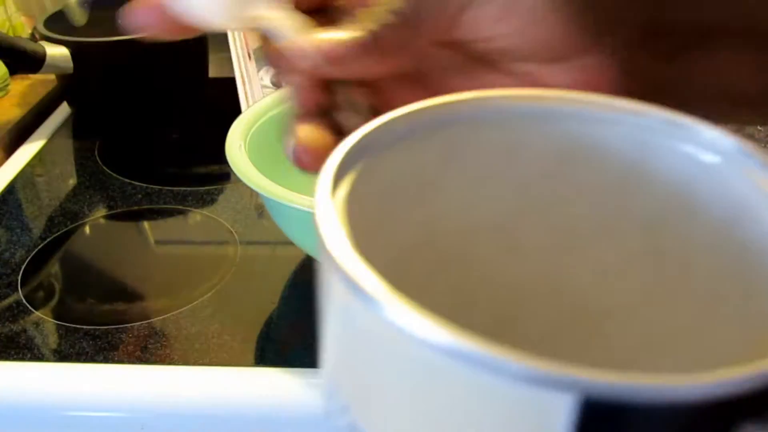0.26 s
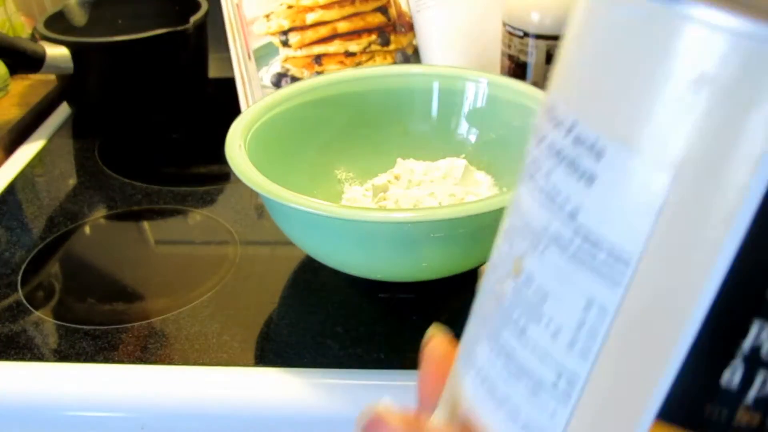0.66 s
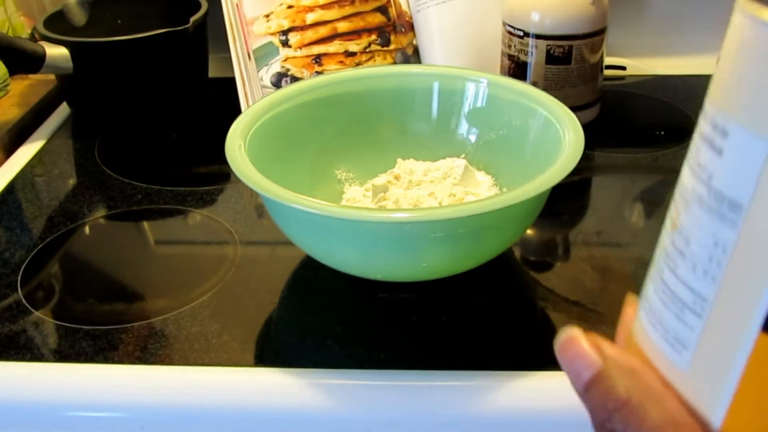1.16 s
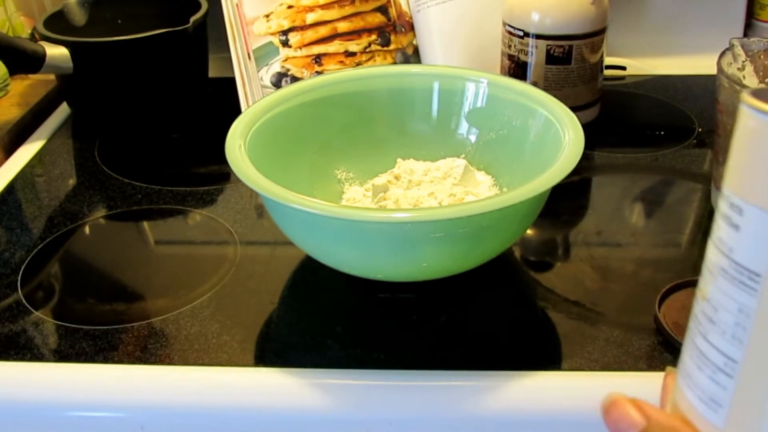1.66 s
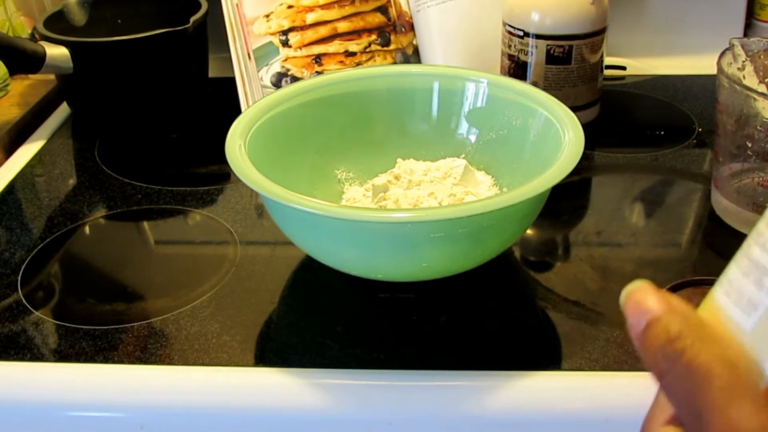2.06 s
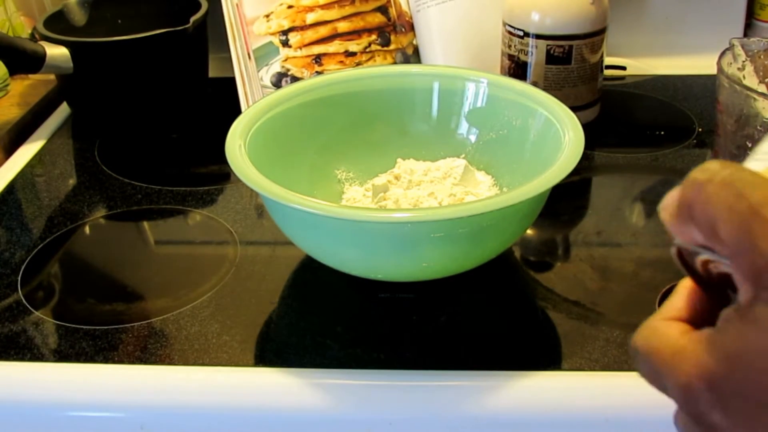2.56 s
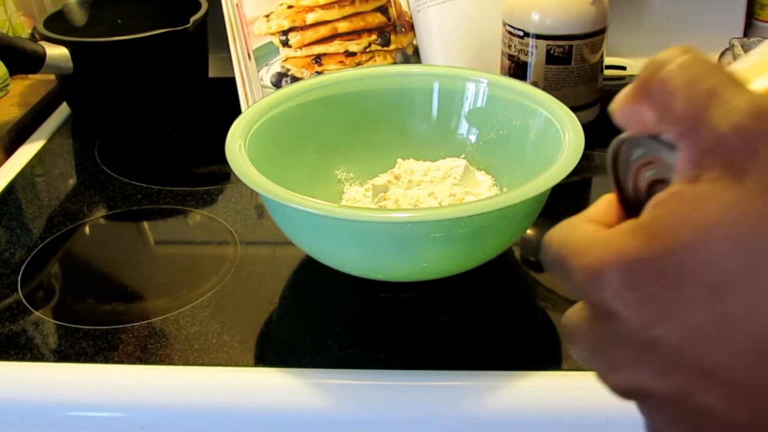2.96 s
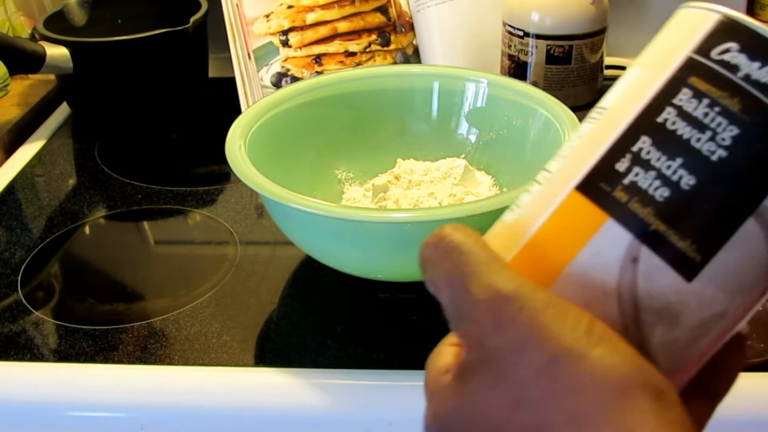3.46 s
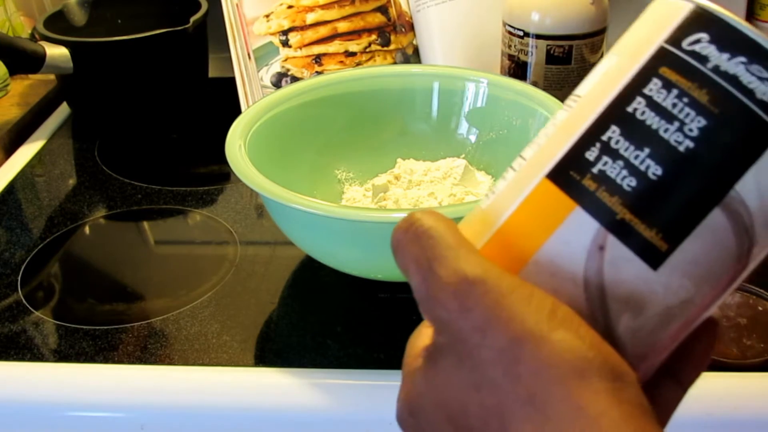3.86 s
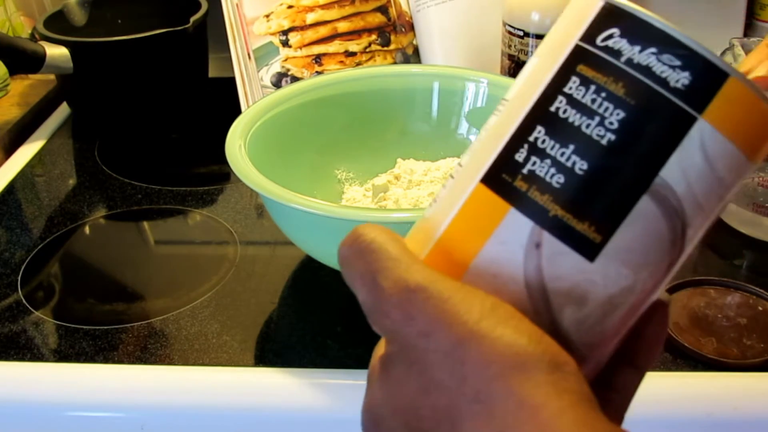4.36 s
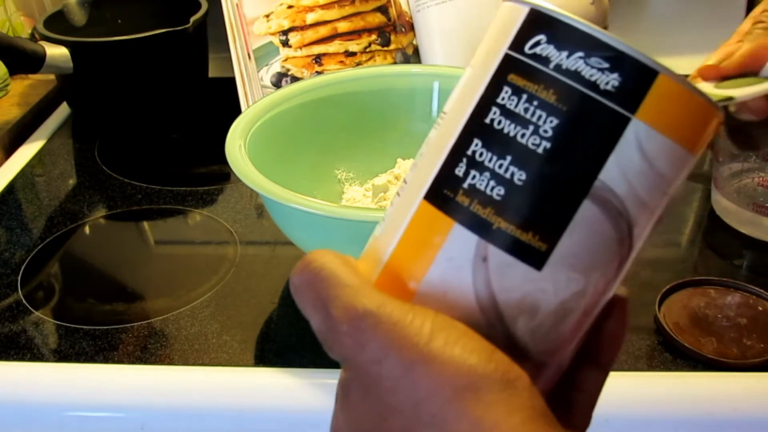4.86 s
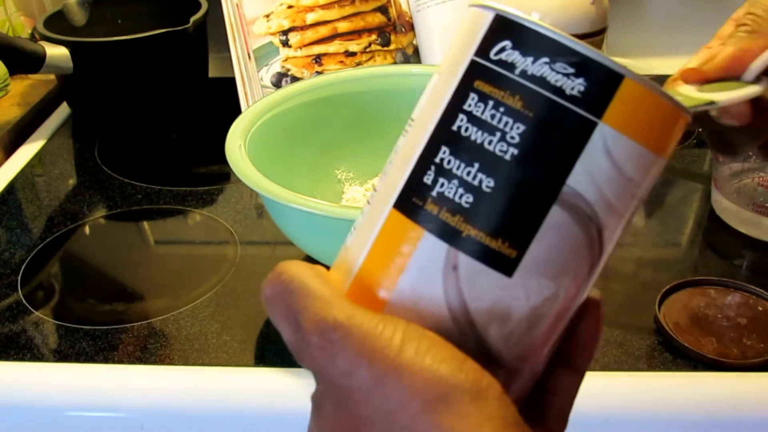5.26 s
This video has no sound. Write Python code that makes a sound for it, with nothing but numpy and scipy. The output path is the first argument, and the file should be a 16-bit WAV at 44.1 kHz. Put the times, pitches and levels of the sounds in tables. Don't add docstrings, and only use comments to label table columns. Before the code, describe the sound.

A small, reflective kitchen heard close in stereo, with low fridge hum, faint rumble and soft hiss. At 0.02-0.07 s a tight volley of very loud, bright plastic clacks bursts out as measuring spoons swing on their ring. Small ticks follow, a strong clack at 0.59, then a dense rattle with rough scraping from 0.65 to 0.83. From 1.25 to 2.15 the spoons are sorted toward the right: separate clicks, dry slides, sharp cracks near 1.4 and 1.89. At 2.33-2.5 a canister is jolted and rapped hollowly; crisp snaps come at 2.59 and 2.76 amid gritty rubbing. Short scrapes and rustling skin and powder fill 3.1-3.4. Blunt, hollow knocks with low thumps land at 3.6, 3.87 and 3.99, quieter ones around 4.4, with a firm rub at 4.8. A light tap at 5.1 leads to a hard knock and clack at 5.25, then near quiet.

```python
import sys
import numpy as np
from scipy import signal
from scipy.fft import rfft, irfft
from scipy.io import wavfile
from scipy.ndimage import uniform_filter1d

SR = 44100
rng = np.random.default_rng(int(sys.argv[2]) if len(sys.argv) > 2 else 0)


def rack_gain(trim_db):
    fader = np.asarray(trim_db, float)
    return 10 ** (fader / 20)


def transcribe(u):
    v = np.clip(np.atleast_2d(u).T, -1, 1)
    q = np.round(v * 32767).astype(np.int16)
    wavfile.write(sys.argv[1], SR, q)


N = 242550

# (frequency [Hz], level [dB], t60 [s])
CANISTER_MODES = [(297, -11.5, 0.093), (433, -4, 0.044), (480, -11, 0.14), (556.4, -8.5, 0.18),
                  (595.4, -9.5, 0.15), (657, 1, 0.039), (764, -10.5, 0.062), (1180, -12, 0.053),
                  (2200, -13, .05), (3950, -19, .06)]
# (time [s], level [dB])
BUSYNESS = [(0.0, -44), (0.26, -58), (0.4, -51.5), (0.52, -49), (0.63, -44), (0.8, -41), (1.06, -55),
            (1.24, -52), (1.6, -58), (1.9, -53), (2.2, -53.5), (2.5, -50.5), (2.86, -57.5), (3.1, -51.5),
            (3.27, -53), (3.45, -56.5), (3.89, -55), (4.5, -66)]
SIDE_SCATTER_DB = 1.9


def rms_one(x):
    return x / np.sqrt(np.mean(x ** 2) + 1e-20)


def in_time(rows):
    s, *columns = np.transpose(rows)
    return [np.interp(np.arange(N) / SR, s, c) for c in columns]


def at_hz(points, hz):
    table_hz, values = np.transpose(points)
    return np.interp(np.log(hz + 1), np.log(table_hz), values)


def coloured(x, spectrum):
    hz = np.fft.rfftfreq(x.shape[-1], 1 / SR)
    return rms_one(irfft(rfft(x) * rack_gain(at_hz(spectrum, hz)), x.shape[-1]))


def bandpass(low_hz, high_hz):
    return signal.butter(2, [low_hz, high_hz], "band", fs=SR, output="sos")


def diffuse(size):
    # (frequency [Hz], correlation [-1 to 1])
    likeness = [(60, -0.48), (180, -0.41), (550, -0.062), (1650, -0.13), (4970, 0.041), (15000, -0.4)]
    mid, side = rfft(rng.standard_normal((2, size)))
    alike = np.clip(at_hz(likeness, np.fft.rfftfreq(size, 1 / SR)), -.95, .95)
    pair = np.sqrt(1 + alike) * mid + np.sqrt(1 - alike) * side * [[1], [-1]]
    return irfft(pair, size) / np.sqrt(2)


def resonance(x, hz, width_hz):
    r, w = np.exp(-np.pi * width_hz / SR), 2 * np.pi * hz / SR
    return signal.lfilter([(1 - r * r) / 2, 0, (r * r - 1) / 2], [1, -2 * r * np.cos(w), r * r], x)


def stroke(start, peak, end, start_db=-16.5, end_db=-17):
    t = np.arange(N) / SR
    on = np.clip(np.minimum((t - start) / .004, (end - t) / .02), 0, 1)
    return on * rack_gain(np.interp(t, [start, peak, end], [start_db, 0, end_db]))


def add(out, sound, s, pan_db):
    lag_per_db = .16
    treble_side = .55
    treble = signal.lfilter(*signal.butter(2, 6000, "high", fs=SR), sound)
    for side, sign in zip(out, (-1, 1)):
        at = round(s * SR) + max(0, round(sign * pan_db * lag_per_db))
        heard = (sound - treble) * rack_gain(-sign * pan_db / 2)
        heard = heard + treble * rack_gain(-sign * pan_db * treble_side / 2)
        side[at:at + len(sound)] += heard[:N - at]


def room_tone():
    # (frequency [Hz], level [dB rms])
    hum_tones = [(120, -62.5)]
    # (frequency [Hz], density [dB per Hz])
    rumble_colour = [(12, -45), (20, -4.5), (71, -3), (120, 0.5), (251, -6.5), (489, -8.5), (536, -10.5),
                     (872, -14), (1500, -24), (1950, -26), (3300, -120)]
    # (frequency [Hz], density [dB per Hz])
    hiss_colour = [(710, -37), (1200, 1), (3480, 1), (11000, -7), (15300, -14.5), (16000, -23),
                   (16500, -50)]
    # (time [s], level [dB])
    gain = [(0.0, 7.5), (0.1, -11), (0.3, -8.5), (0.6, -0.8), (2.6, 0), (2.9, -2.5), (3.9, 0.5),
            (5.5, -1.5)]
    rumble_db, hiss_db = -52, -61.5
    (gain_db,), (busy_db,) = in_time(gain), in_time(BUSYNESS)
    t = np.arange(N) / SR
    wobble = 1 + 0.24 * rms_one(uniform_filter1d(rng.standard_normal((2, N)), size=3000))
    hum = sum(rack_gain(db + 2.5) * np.sin(2 * np.pi * hz * t) for hz, db in hum_tones) * wobble
    rumble = rack_gain(rumble_db + gain_db + 4.5) * coloured(diffuse(N), rumble_colour)
    hiss_level = np.hypot(rack_gain(busy_db), rack_gain(hiss_db + gain_db))
    return hum + rumble + hiss_level * coloured(diffuse(N), hiss_colour)


def kitchen(x, wet_db):
    # (frequency [Hz], t60 [s])
    decay = [(200, 0.29), (600, 0.35), (3500, 0.39), (8000, 0.26), (15000, 0.29)]
    places, stretch = 7, round(.21 * SR)
    t, out = np.arange(round(.45 * SR)) / SR, np.zeros((2, N))
    edges = 100 * 2 ** np.arange(0, 7.6, 1.0)
    noise, tails = np.array([diffuse(len(t)) for place in range(places)]), 0
    for low, high in zip(edges, np.append(edges[1:], 18000)):
        band = signal.sosfilt(bandpass(low, high), noise)
        tails = tails + band * rack_gain(-60 * t / at_hz(decay, np.sqrt(low * high)))
    tails = tails * (1 - np.exp(-t / 0.0016)) * (1 + 2.14 * rack_gain(-60 * t / 0.15))
    tails = tails / np.sqrt(np.mean(np.sum(tails ** 2, -1)))
    for k, at in enumerate(range(0, N, stretch)):
        sent = x[:, at:at + stretch].mean(0, keepdims=True)
        echo = signal.fftconvolve(sent, tails[k % places], axes=1)
        out[:, at:at + echo.shape[1]] += echo[:, :N - at]
    return rack_gain(wet_db) * out


def rustle():
    # (start [s], peak [s], end [s], peak level [dB])
    brushes = [(0.0, 0.03, 0.14, -50), (0.305, 0.42, 0.48, -53), (0.645, 0.661, 1.5, -62),
               (0.7, 0.82, 0.6, -53), (0.96, 1.01, 1.13, -49.5), (1.22, 1.3, 1.65, -56),
               (1.698, 1.76, 2.9, -55.5), (2.0, 2.07, 1.78, -53), (2.27, 2.27, 3.8, -59),
               (2.442, 2.54, 1.8, -74), (2.8, 3.05, 2.8, -57), (3.111, 3.28, 3.43, -43),
               (3.72, 3.76, 3.14, -66), (4.0, 4.12, 4.36, -54), (4.334, 4.42, 4.6, -61),
               (4.5, 4.998, 5.5, -71)]
    edge_db = -8
    top = signal.butter(2, 7500, "high", fs=SR, output="sos")
    hiss = rms_one(signal.sosfilt(top, diffuse(N) + 0.81 * rng.standard_normal(N)))
    busy_db, = in_time(BUSYNESS)
    steady = rack_gain(-18.5 - 52 + 0.8 * (busy_db + 52))
    brushing = sum(stroke(*span, edge_db, edge_db) * rack_gain(db) for *span, db in brushes)
    return (steady + brushing) * hiss


def rubbing():
    # (start [s], peak [s], end [s], peak level [dB], loudest mode [Hz])
    rubs = [
        (2.378, 2.535, 2.83, -49.5, 550),
        (2.806, 2.957, 3.5, -57, 558),
        (3.105, 3.14, 3.175, -42, 508),
        (3.2, 3.242, 3.29, -43, 523),
        (4.36, 4.4, 4.47, -44, 630),
        (4.786, 4.826, 4.85, -39, 584),
    ]
    noise = rng.standard_normal(N)
    hum = rms_one(sum(rack_gain(db) * resonance(noise, hz, 6 / t60) for hz, db, t60 in CANISTER_MODES))
    clumps = rack_gain(2.1 * rms_one(uniform_filter1d(rng.standard_normal(N), size=500)))
    out = 0
    for *span, db, hz in rubs:
        loudest = rms_one(resonance(noise, hz, 30))
        out = out + stroke(*span) * rack_gain(db) * (0.46 * hum + 0.96 * loudest)
    return out * clumps * rack_gain([[-3], [3]])


def slides():
    # (start [s], peak [s], end [s], peak level [dB], centre [Hz])
    scrapes = [(0.648, 0.648, 0.77, -46, 4000), (0.711, 0.715, 0.73, -49, 3370),
               (0.73, 0.771, 0.68, -41, 5200), (0.937, 0.992, 1.116, -50, 4000),
               (1.23, 1.282, 1.36, -54.5, 4700), (1.322, 1.341, 1.34, -37.5, 4150),
               (1.35, 1.396, 1.486, -46, 4070), (1.726, 1.811, 1.88, -54.5, 4150),
               (1.849, 1.884, 1.98, -42, 4600), (2.42, 2.563, 2.65, -45.5, 2970),
               (2.676, 2.682, 2.7, -43, 4180), (2.686, 2.726, 2.81, -47.5, 7500),
               (2.781, 2.84, 2.96, -55, 6500), (2.877, 2.986, 3.08, -57, 3460),
               (3.114, 3.196, 3.27, -44.5, 4360), (3.163, 3.243, 3.37, -44, 5030),
               (3.72, 3.757, 3.77, -51, 3680), (4.007, 4.002, 4.2, -57.5, 3700),
               (4.355, 4.386, 4.45, -53.5, 3770), (4.763, 4.786, 4.88, -51, 3320),
               (5.203, 5.213, 5.38, -51, 5000)]
    # (frequency [Hz], density [dB per Hz])
    grit_colour = [(650, -58), (1100, -11), (2250, -3), (3730, -3.5), (4220, -13), (5400, -5.5),
                   (9450, -6.5), (16000, -23)]
    # (start [s], peak [s], end [s], peak level [dB], ring [Hz])
    rough_rings = [(0.74, 0.772, 0.80, -36.5, 5500), (0.765, 0.78, 0.777, -43, 1650),
                   (0.67, 0.805, 0.86, -41, 3150), (0.72, 0.77, 0.91, -38.5, 8200),
                   (3.165, 3.24, 3.29, -44.5, 2056), (3.17, 3.2, 3.26, -46, 4600),
                   (4.36, 4.4, 4.43, -48, 4700), (2.37, 2.385, 2.44, -47.5, 2500),
                   (2.468, 2.475, 2.5, -41, 1500), (0.59, 0.82, 0.655, -40, 3800),
                   (3.3, 3.33, 3.355, -52, 5100)]
    slip = rng.random(N) < 7000 / SR
    slips = rng.standard_normal(N) * rack_gain(3.6 * np.minimum(rng.exponential(1, N), 3)) * slip
    grit = coloured(slips + .5 * rng.standard_normal(N), grit_colour)
    clumps = rack_gain(1.5 * rms_one(uniform_filter1d(rng.standard_normal(N), size=250)))
    out = 0
    for *span, db, hz in scrapes:
        out = out + stroke(*span) * rack_gain(db) * (1.52 * grit + 1.38 * resonance(grit, hz, 0.77 * hz))
    for *span, db, hz in rough_rings:
        ring = rms_one(resonance(resonance(slips, hz, 0.29 * hz), hz, 0.395 * hz))
        out = out + stroke(*span, -5, -6) * rack_gain(db) * ring
    out = clumps * out
    return [np.roll(out, 1), out] * rack_gain([[-2.4], [2.4]])


def thumps():
    # (time [s], peak level [dB], frequency [Hz])
    jolts = [
        (2.326, -25.5, 122),
        (2.388, -26.5, 175),
        (2.551, -33, 140),
        (2.666, -39, 119),
        (3.409, -24, 183),
        (3.601, -31, 212),
        (3.867, -33, 169),
        (3.994, -25.5, 189),
        (4.411, -29, 158.9),
        (5.256, -17, 159.4),
    ]
    out, t = np.zeros((2, N)), np.arange(round(.3 * SR)) / SR
    for s, db, hz in jolts:
        swell = 1 - np.exp(-t / 0.0042)
        add(out, rack_gain(db + 8.5) * swell * np.sin(2 * np.pi * hz * t) * rack_gain(-60 * t / 0.025), s, -3.5)
    return out


def knocks():
    # (time [s], peak level [dB], wall pitch [Hz], edge rap [dB], treble of the rap [dB])
    hits = [(2.3636, -15, 800, 9.5, -1.5), (2.459, -20.5, 815, 9.5, -8), (2.465, -23, 627, 12, 14),
            (2.4708, -26, 620, 3, -10), (2.4998, -38, 607, -25, -5), (2.5864, -32, 430, -4, -5),
            (2.6659, -42, 455, -27, -5), (2.683, -40, 500, -23, -8), (2.709, -35.5, 480, -20, -5),
            (2.8287, -36.5, 538, -16, -5), (2.8806, -34, 523, -3, -6), (2.965, -43, 587.6, -15, -5),
            (3.0509, -36.5, 545, -23, -5), (3.1532, -35, 413, -27, -5), (3.172, -23.5, 383, -12, -5),
            (3.1861, -30, 480, -29, -5), (3.4106, -28, 433, -25, -5), (3.6006, -17, 617, -1, -16),
            (3.7073, -30.5, 470, 0, -18), (3.8634, -11, 554, 1, -5), (3.994, -15, 469, 3, -0.5),
            (4.3564, -25, 618, 2.5, -18), (4.413, -22.5, 467, 0, -8), (4.4348, -32, 646, 5, -2),
            (4.769, -37.5, 585, -5, -6), (4.779, -32.5, 639, -8, -5), (5.0989, -26, 619, 5.5, -1.5),
            (5.203, -31, 632.8, 3, -4), (5.255, -16, 448, 5.5, -0.5), (5.263, -19, 587, -24, -3),
            (5.2831, -24.5, 635, 8, -5.5)]
    canister_side_db = -7
    wall_stop = 2.2
    out, t = np.zeros((2, N)), np.arange(round(.3 * SR)) / SR
    hz_modes, db_modes, t60_modes = np.transpose(CANISTER_MODES)[:, :, None]
    push = np.hanning(round(0.0005 * SR))
    rap_band, snap_band = bandpass(600, 2850), bandpass(3200, 8200)
    for s, db, hz, rap_db, treble_db in hits:
        t60 = max(0.024 - 0.0007 * (db + 30.5), .005)
        wall_rise = 1 - np.exp(-t / (0.00027 * rack_gain(-0.25 * rap_db)))
        wall = wall_rise * np.sin(2 * np.pi * hz * t) * rack_gain(-60 * (t / t60) ** wall_stop)
        luck = rng.standard_normal((len(CANISTER_MODES), 1))
        mode_db = db_modes - 7.5 + 0.55 * luck - 2.4 * np.abs(np.log2(hz_modes / hz))
        body = np.sign(luck) * rack_gain(mode_db - 60 * t / t60_modes) * np.sin(2 * np.pi * hz_modes * t)
        body_rise = 1 - np.exp(-(t / 0.0042) ** 2)
        swing = np.convolve(wall + body_rise * body.sum(0), push)[:len(t)]
        rap = 0.36 * rng.standard_normal(len(t)) * rack_gain(-60 * t / 0.056)
        rap[:7] -= 3 * np.hanning(7)
        snap = rack_gain(treble_db) * signal.sosfilt(snap_band, rap)
        bark = 0.28 * resonance(rap, 890, 340)
        rap = signal.sosfilt(rap_band, rap) + snap + bark
        sound = swing / np.abs(swing).max() + rack_gain(rap_db) * rap / np.abs(rap).max()
        add(out, rack_gain(db) * sound, s, canister_side_db + SIDE_SCATTER_DB * rng.standard_normal())
    return out


def canister_hits():
    return signal.sosfilt(signal.butter(2, 110, "high", fs=SR, output="sos"), knocks() + thumps())


def clacks():
    # (time [s], peak level [dB], bowl resonance [Hz], crack [dB])
    swinging = [(0.0215, -21, 9900, 2), (0.0267, -12.5, 8100, 4.5), (0.0486, -5.5, 6230, 2),
                (0.0585, -9.5, 4400, -1), (0.0587, -6.5, 7850, 8), (0.0666, -4, 3430, -4.5),
                (0.0672, -13.5, 7000, -7), (0.203, -24.5, 5340, 9), (0.2898, -24, 3620, -6),
                (0.2952, -24, 3750, -15), (0.3238, -18.5, 5360, 5), (0.3733, -28.5, 3070, 11),
                (0.4295, -31, 3370, 11), (0.4836, -26.5, 8000, 26), (0.5894, -10, 3930, 1.5),
                (0.592, -26.5, 7900, -16), (0.6085, -22, 3870, -18), (0.6516, -25, 9500, -4),
                (0.658, -27.5, 12400, -4), (0.6661, -21, 3930, 8), (0.711, -20, 3400, -2),
                (0.732, -20, 2920, 9), (0.7562, -18, 6560, 6), (0.7465, -24, 3150, 0),
                (0.7575, -25, 3050, -3), (0.7632, -25, 4900, 6), (0.7697, -19.5, 5400, -1),
                (0.7735, -18, 5400, -4), (0.778, -16, 1870, 11), (0.783, -28, 1390, 12),
                (0.8221, -21, 4950, 5), (0.8275, -27, 3230, -1), (0.8308, -21, 5100, 6),
                (0.8315, -23.5, 3460, -13), (0.9666, -27, 3300, 11), (1.0724, -20.5, 5820, 0.5)]
    # (time [s], peak level [dB], bowl resonance [Hz], crack [dB])
    sorting = [(1.256, -27.5, 4150, 12), (1.2789, -35, 3420, -3), (1.2937, -25.5, 5100, -0.5),
               (1.3484, -20, 4070, 17), (1.3613, -22, 3480, 7), (1.3918, -14.5, 6060, 12),
               (1.601, -37.5, 3550, 2.5), (1.789, -34.5, 3770, 5), (1.814, -39, 1500, -3),
               (1.8614, -15.5, 4400, 31), (1.8663, -21, 6540, 7), (1.87, -25, 4000, -16),
               (1.8888, -22.5, 5800, -3), (1.8908, -22.5, 3520, -9), (1.8924, -9.5, 4570, 36),
               (1.8986, -16, 7600, 10), (2.0499, -24, 5060, 29), (2.1319, -15.5, 5820, -2.5),
               (2.1375, -31, 6130, -27), (2.1422, -23, 6500, -13)]
    # (time [s], peak level [dB], bowl resonance [Hz], crack [dB])
    scooping = [(2.3305, -22.5, 4400, 42), (2.362, -28, 5900, -7), (2.3642, -10, 7540, 32),
                (2.406, -26, 3670, -10), (2.5373, -21.5, 3100, 10), (2.5872, -6, 4860, 6.5),
                (2.588, -13, 8200, 1), (2.591, -15, 2480, -2), (2.5964, -13, 4700, 7),
                (2.6053, -18, 5000, 19), (2.683, -17, 4300, 13), (2.7248, -20.5, 5500, 3),
                (2.729, -20, 6200, -2), (2.75, -17, 5000, 4.5), (2.756, -10, 7850, -2),
                (2.7578, -9.5, 7330, -2), (2.7595, -9.5, 7600, -1), (2.7615, -16.5, 5970, -28),
                (3.0483, -23, 5160, 33), (3.3957, -19, 8300, -1), (3.399, -33, 2890, -3),
                (3.3941, -21, 12400, -13), (3.3975, -17, 8460, -27), (3.399, -20, 9900, -5),
                (3.5235, -35, 1850, 13), (3.765, -38, 10000, -3), (3.994, -10.5, 4960, 11.5),
                (4.2583, -44, 11950, -2), (4.3225, -38, 2323, 4), (4.356, -29, 5090, -5),
                (4.787, -43, 3400, 0), (4.953, -50, 10600, -3), (5.2545, -16.5, 1460, 5),
                (5.2554, -7, 6600, 13.5), (5.263, -22, 6500, 13), (5.2827, -27, 7000, -1),
                (5.2597, -21.5, 1590, -7), (5.392, -48, 2360, 16)]
    # (time [s], left-right level [dB])
    spoon_side = [(0.0, 4), (0.33, -1), (0.6, -5), (0.77, -8), (1.07, -6.5), (1.3, -12), (1.87, -9.5),
                  (2.14, -5.5), (2.59, -3.5), (2.76, -1), (3.4, -4), (4.0, -5), (5.5, -2.5)]
    out, t = np.zeros((2, N)), np.arange(round(.12 * SR)) / SR
    side_db, = in_time(spoon_side)
    for s, db, hz, crack_db in swinging + sorting + scooping:
        pan_db = side_db[round(s * SR)]
        chatter_db = -19.5 + 1 * (hz / 1000 - 5) - 0.5 * (pan_db + 4) + 1.1 * rng.standard_normal()
        drive = rack_gain(chatter_db) * rng.standard_normal(len(t)) * rack_gain(-60 * t / 0.033)
        drive[0] = -1.5
        width_hz = hz * np.clip(.24 * rack_gain(crack_db / 2), .09, .5)
        bowl = resonance(resonance(drive, hz, width_hz), hz, 2.5 * width_hz)
        overtone = rack_gain(-17.0) * resonance(drive, min(1.75 * hz, .3 * SR), 1.1 * hz)
        crack_band = bandpass(900 + 0.24 * hz, min(4000 + 1.23 * hz, .35 * SR))
        crack = rack_gain(crack_db) * 0.18 * signal.sosfilt(crack_band, drive)
        rise_s = .00025 * rack_gain(-np.clip(crack_db, -8, 20))
        sound = (bowl + overtone + crack) * (1 - np.exp(-(t + 1 / SR) / rise_s))
        sound = rack_gain(db) * sound / np.abs(sound[:200]).max()
        add(out, sound, s, pan_db + SIDE_SCATTER_DB * rng.standard_normal())
    return out


def scene():
    spoons, canister, sliding = clacks(), canister_hits() + rubbing(), slides()
    near = spoons + canister + sliding
    echoes = kitchen(spoons + rack_gain(-1.0) * canister + rack_gain(-2) * sliding, wet_db=-3.0)
    return near + echoes + rustle() + room_tone()


def roll_off(x):
    return signal.sosfilt(signal.butter(12, 16800, fs=SR, output="sos"), x)


def record(dry):
    side = signal.sosfilt(signal.butter(1, 800, "high", fs=SR, output="sos"), dry[0] - dry[1]) / 2
    wide = dry + (rack_gain(1) - 1) * side * [[1], [-1]]
    mix = signal.sosfilt(signal.cheby1(8, .5, 15900, fs=SR, output="sos"), wide)
    return roll_off(np.clip(mix, -.99, .99))


dry = scene()
out = record(dry)
transcribe(out)
```